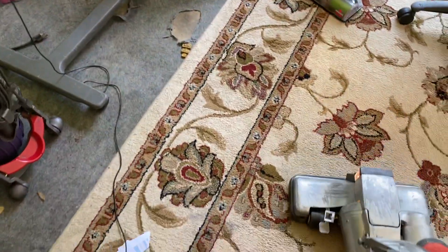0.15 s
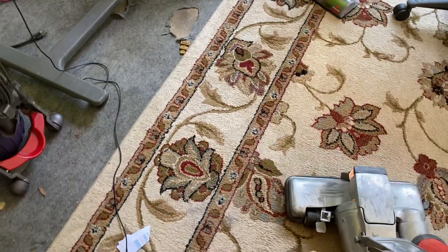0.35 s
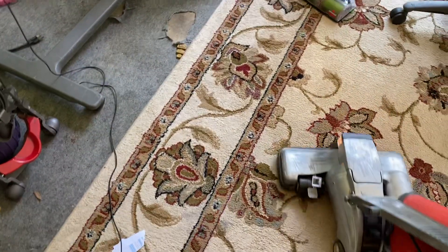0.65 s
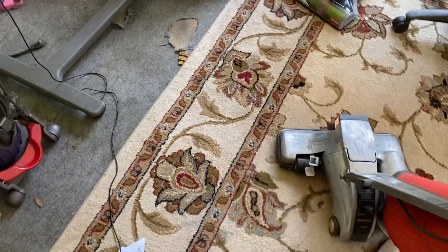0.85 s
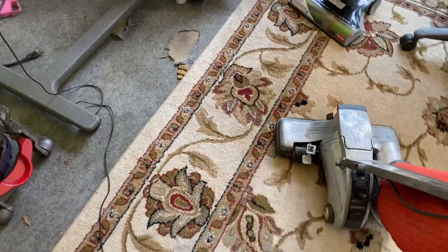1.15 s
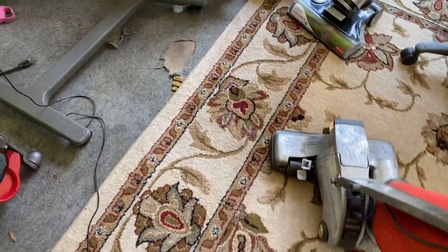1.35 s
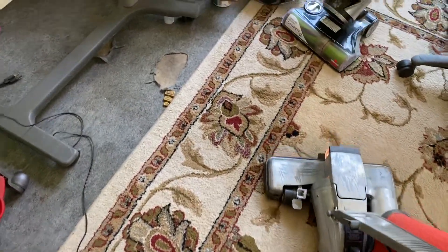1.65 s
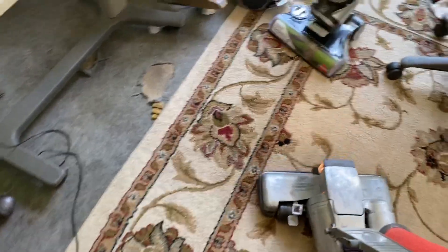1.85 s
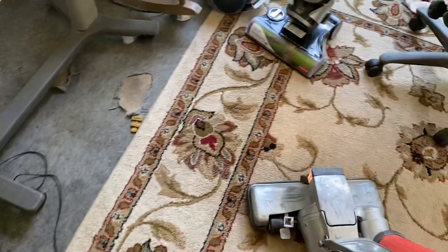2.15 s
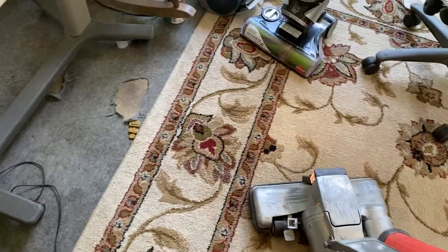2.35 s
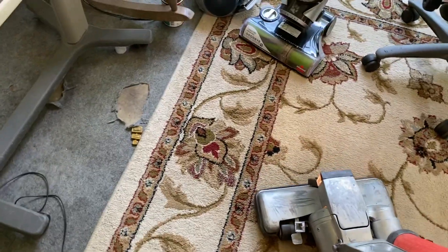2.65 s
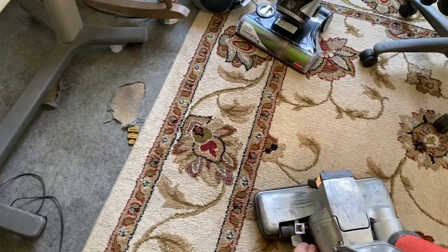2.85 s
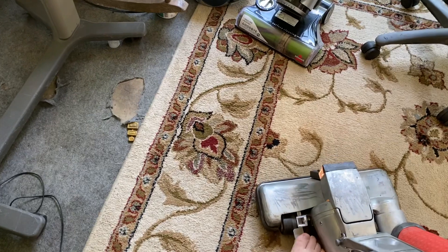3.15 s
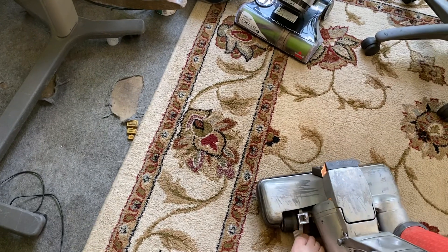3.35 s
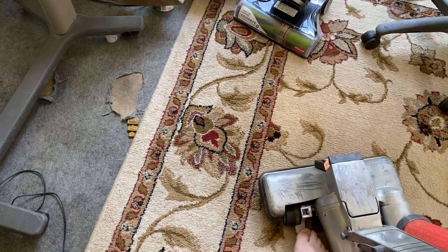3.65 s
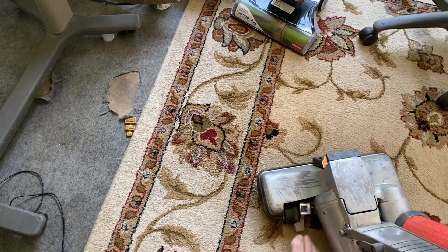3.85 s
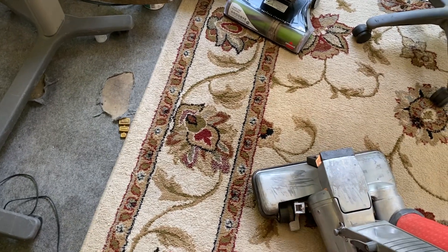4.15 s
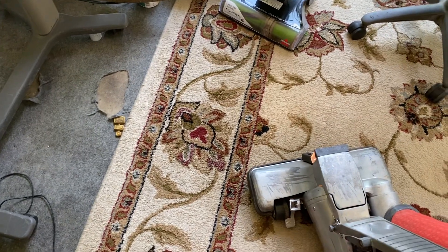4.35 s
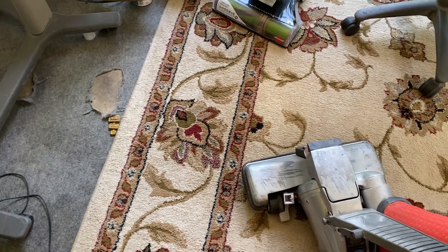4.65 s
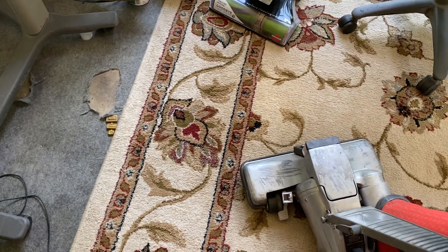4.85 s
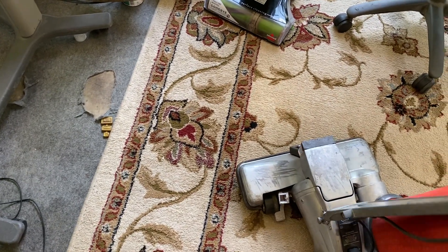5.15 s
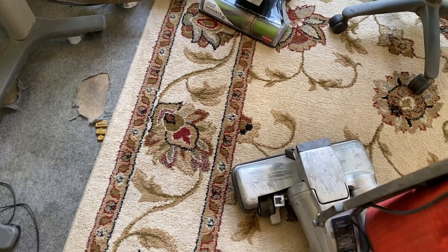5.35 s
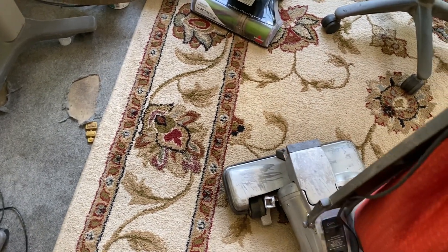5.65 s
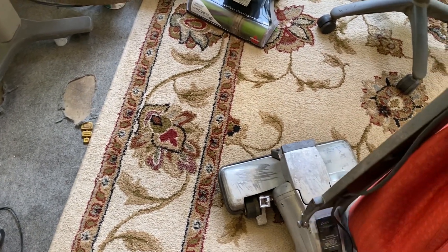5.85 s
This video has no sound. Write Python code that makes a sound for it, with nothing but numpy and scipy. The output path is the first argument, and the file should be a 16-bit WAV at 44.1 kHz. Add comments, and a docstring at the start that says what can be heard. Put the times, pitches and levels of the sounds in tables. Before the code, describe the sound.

An upright vacuum roars and whines on a rug, its lever ratchets through sharp clicks, then it switches off and the motor whine winds down.

```python
"""A loud roar of air with a motor's whine: an upright vacuum cleaner runs on a rug, its brush roll drumming on the pile.
The harder the brush bears on the rug, the slower the motor and the less air leaks in; the cleaner is drawn a bit closer.
The height lever ratchets through five notches and lifts the brush, so the unloaded motor speeds up a little.
Then the switch clicks off and the motor coasts down, its whine falling through the resonances of the housing.
Air is shaped noise, the motor and brush are sums of sines tied to one shaft, and clicks are short rings and cracks."""
import sys
import numpy as np
from scipy import signal
from scipy.fft import rfft, irfft
from scipy.io import wavfile
from scipy.ndimage import uniform_filter1d

SR = 44100
rng = np.random.default_rng(int(sys.argv[2]) if len(sys.argv) > 2 else 0)


def write(x):
    x = np.atleast_2d(x).T
    wavfile.write(sys.argv[1], SR, np.round(np.clip(x, -1, 1) * 32767).astype(np.int16))


N = 264644
T = np.arange(N) / SR
HZ = np.fft.rfftfreq(N, 1 / SR)

# All noise colours below are relative: noise() evens out their overall loudness.
OFF_S = 4.489  # the power is cut here
FREE_SPEED = 199.0  # unloaded shaft speed, turns a second
BEATS_PER_TURN = .617  # drum beats of the brush roll in one turn of the motor
HUM_ORDER, WHINE_ORDER, BLADES, BARS = 2, 6, 11, 22  # multiples of the shaft speed; BARS is the commutator tone

# How hard the brush roll bears on the rug: (t/s, contact 0-1)
RUG_CONTACT = [(0.0, 0.42), (0.04, 0.93), (0.19, 0.05), (0.43, 0.02), (0.51, 0.89), (0.73, 0.91),
               (0.93, 0.48), (1.35, 0.86), (1.65, 0.7), (1.98, 0.69), (3.05, 0.89), (3.33, 0.24),
               (3.97, 0.03)]


def rug_contact():
    """The brush bears harder or softer on the rug as time goes by."""
    return curve(RUG_CONTACT)


def shaft_speed(contact, sag=6, inertia_s=.238, first_load=.74, friction=43.4, air_drag=.004144):
    """The rug drags the motor down a little; once the power is cut, air drag and friction brake it."""
    # sag: turns a second lost at full contact
    powered = FREE_SPEED - sag * lagged(contact, inertia_s, first_load)
    # coasting, each second costs friction + air_drag * speed squared, in turns a second
    knee = np.sqrt(friction / air_drag)  # the speed at which both brake equally
    first_angle = np.arctan(np.interp(OFF_S, T, powered) / knee)
    coasting = knee * np.tan(first_angle - knee * air_drag * (T - OFF_S))
    return np.where(T < OFF_S, powered, coasting)


def working_state(contact, speed, air_lag_s=0.19):
    """What the levels depend on: rug contact, closeness, nozzle height and halvings of the air speed."""
    closer = np.interp(T, [1.82, 2.2], [0, 1])  # the cleaner is drawn closer
    raised = np.interp(T, [3.294, 3.465], [0, 1])  # the lever raises the nozzle
    # the air stream follows the fan a little late
    halvings = lagged(np.log2(FREE_SPEED / speed) * (T > OFF_S), air_lag_s)
    return contact, closer, raised, halvings


# Colours of the moving air, from deep to high: (f/Hz, level/dB per Hz)
ROAR_COLOUR = [(20, -61), (60, -19.5), (110, -10), (180, -9.5), (245, 0.5), (300, -6), (400, 3.5),
               (445, -5), (510, 1.5), (600, -7.5), (760, -46), (1200, -96.5)]
UPPER_COLOUR = [(450, -9), (590, 11), (820, 5.5), (945, 7.5), (1100, 2), (1290, 1.5), (1480, -85)]
RUSH_COLOUR = [(900, -0.5), (1400, 5), (1750, 5), (2100, 5), (2450, -0.5), (2750, 2), (3300, -5),
               (4000, -12), (7000, -23)]
HISS_COLOUR = [(1200, -15), (2200, 1), (3000, 5), (3800, 3), (4400, 5.5), (5200, 1.5), (7500, 2),
               (9000, -1), (10500, 3.5), (12000, 3), (13200, -4), (16300, -9)]
# Loudness of each: (clear of the rug level/dB, then the change/dB
# at full contact, once closer, once raised, per halving of the air speed)
ROAR_LEVEL = (-19, -8.5, 2, -5.5, -14.5)
UPPER_LEVEL = (-22.5, -11.5, 4.5, -9.5, -20.5)
RUSH_LEVEL = (-32, -2.5, 0.45, -4.5, -18.5)
HISS_LEVEL = (-41, -3.5, 0.7, -7, -5.5)


def air(turns, state, gust_db=1.0, chop=0.044, upper_ringing=0.17, rush_ringing=0.23, gap_s=0.09):
    """The fan roars through housing and bag, louder when air leaks in; the brush roll chops rush and hiss."""
    contact, *rest = state
    # the air leak under the nozzle opens and closes over gap_s
    seal = uniform_filter1d(contact, size=max(round(gap_s * SR), 1))
    air_state = [seal, *rest]
    roar = amp(level_of(ROAR_LEVEL, air_state)) * noise(ROAR_COLOUR)
    upper = amp(level_of(UPPER_LEVEL, air_state)) * noise(UPPER_COLOUR, upper_ringing)
    rush = amp(level_of(RUSH_LEVEL, air_state)) * noise(RUSH_COLOUR, rush_ringing)
    hiss = amp(level_of(HISS_LEVEL, air_state)) * noise(HISS_COLOUR)
    gust = amp(gust_db * wander(24.0))
    chopped = 1 + chop * np.cos(2 * np.pi * BEATS_PER_TURN * turns)
    return gust * (roar + upper + chopped * (rush + hiss))


# Weaker motor tones under power: (multiple of the shaft speed, level/dB)
POWERED_TONES = [(10, -52), (11, -41), (12, -46.5), (14, -50), (15, -53), (16, -54), (18, -57), (19, -57),
                 (24, -57), (31, -58), (39, -53), (40, -55), (54, -50.5), (55, -55), (57, -53.5)]
# Motor tones while coasting: (multiple of the shaft speed, level/dB)
COAST_TONES = [(2, -34), (6, -33), (11, -37), (16, -45), (18, -51), (22, -45.5), (23, -50), (27, -51),
               (30, -53), (34, -49), (37, -53), (38, -49), (41, -53), (44, -51), (49, -54), (60, -51)]
# The whine under power, which swells and fades: (t/s, level/dB)
WHINE_LEVEL = [(0, -32), (.48, -26.5), (.62, -45.5), (.79, -29.5), (1.1, -29.5), (1.35, -37), (1.6, -36),
               (1.85, -28.5), (2.6, -27), (3.1, -35.5), (3.5, -46.5), (4, -32)]
# Hum, and shift of the weaker tones: (clear of the rug level/dB,
# then the change/dB at full contact, once closer, once raised)
HUM_LEVEL = (-20.5, -7.5, 1, -7)
THIN_LEVEL = (-2.5, 0, 1.5, -6.5)
# Resonances the falling tones sweep through: (f/Hz, width f/Hz, level/dB)
HOUSING = [(400, 60, -1), (505, 60, -3), (605, 45, -5), (740, 40, -4), (830, 35, -8), (945, 60, 1.5),
           (1020, 40, -7.5), (1270, 70, -11), (1520, 70, -13), (1740, 100, -8), (2060, 110, -11),
           (2420, 200, -4), (2650, 110, -7), (2930, 230, 1), (3300, 230, -2.5), (3650, 190, -3),
           (4220, 400, -9), (7600, 900, -12), (11000, 1800, -10)]
# Resonances of the air path, for the falling whine: (f/Hz, width f/Hz, level/dB)
AIR_PATH = [(435, 42, 6.5), (492, 45, -2), (555, 20, -5), (732, 22, -2), (822, 38, 1), (1015, 75, 3.5),
            (1150, 120, 2.5)]
# Resonances of the motor case, for the falling commutator tone: (f/Hz, width f/Hz, level/dB)
MOTOR_CASE = [(1730, 70, -9), (2420, 190, -2.5), (2660, 110, -5), (2950, 170, -0.5), (3270, 230, 2),
              (3600, 150, -11)]


def motor(speed, turns, state, faint_db=-62, glide_db=-57.5, commutator_db=-53, fading_db=2.5,
          flutter_db=1.54, stall_speed=90.5, stall_db=-40, blur=0.0064, release=.13):
    """Imbalance, fan blades and carbon brushes sound multiples of the shaft speed."""
    powered_db, coast_db = ({round(k): db for k, db in table} for table in (POWERED_TONES, COAST_TONES))
    strong = {
        HUM_ORDER: level_of(HUM_LEVEL, state),
        WHINE_ORDER: curve(WHINE_LEVEL),
        BARS: commutator_db + fading_db * wander(7.3),
    }
    thin_db = level_of(THIN_LEVEL, state)  # at the pitch of the commutator tone; higher tones change more

    # free goes from 0 under power to 1 when the share "release" of the speed is lost
    slowing = np.clip(1 - speed / FREE_SPEED, 0, 1) * (T > OFF_S)
    free = np.minimum(slowing / release, 1)
    # stall_db for each halving below stall_speed (turns a second)
    stall = stall_db * np.maximum(np.log2(stall_speed / speed), 0)

    grid = np.arange(0, SR / 2, 2)
    housing = resonances(HOUSING, grid)
    own_path = {WHINE_ORDER: resonances(AIR_PATH, grid), BARS: resonances(MOTOR_CASE, grid)}
    steady, gliding = np.zeros((2, 2, N))
    for k in [HUM_ORDER, *range(5, 73)]:
        strength, swell = rng.standard_normal(), wander(7.2)
        # the fast air stream roughens the tones
        smear = blur * (1 - free) * np.sqrt(k) * wander(23)
        partial = tone(k * turns + smear, k * speed[0])
        thin = powered_db.get(k, faint_db) + thin_db * k / BARS + fading_db * swell
        steady += amp(strong.get(k, thin) + flutter_db * wander(4.6)) * partial
        # a falling tone flares at each resonance
        free_db = coast_db.get(k, glide_db + 2 * (strength + swell))
        flare = np.interp(k * speed, grid, own_path.get(k, housing))
        # the fan's tones die as the air stalls, the high ones fade more slowly
        airborne = np.clip((BLADES / k) ** 2, .2, 1)
        gliding += amp(free_db + flare + stall * airborne) * partial
    return (1 - free ** 2) * steady + reflections(free * gliding)


def mains_ripple(speed, turns, contact, level_db=-64, load_db=9, fading_db=4.0):
    """Current pulses put a tone on either side of the commutator tone, stronger under load, until power-off."""
    ripple = 120 * T  # pulses so far, at 120 Hz
    pair = 0
    for side in (-1, 1):
        pair = pair + amp(fading_db * wander(7.0)) * tone(BARS * turns + side * ripple, BARS * speed[0])
    return pair * amp(level_db + load_db * contact) * (T < OFF_S)


# Scraping of the carbon brushes: (f/Hz, level/dB per Hz)
RUB_COLOUR = [(1400, -5.5), (1650, -14), (2100, -10), (2700, -4), (3400, -10), (4500, -9), (9000, -26)]


def carbon_rub(speed, level_db=-52, slope_db=-2.0, ringing=0.58):
    """The carbon brushes keep scraping the commutator as long as it turns."""
    # slope_db for each doubling of speed
    return amp(level_db + slope_db * np.log2(speed / speed[0])) * noise(RUB_COLOUR, ringing)


# Rumble of the floor: (f/Hz, level/dB per Hz)
RUMBLE_COLOUR = [(10, -55), (30, -29), (48, -13), (66, 12), (95, 10), (150, 16), (300, -45)]
# Drumming and rumble: (clear of the rug level/dB, then the change/dB
# at full contact, once closer, once raised, per halving of the air speed)
DRUM_LEVEL = (-38, 18.5, -3.5, -0.5, -44)
RUMBLE_LEVEL = (-56, 22.5, -3.5, -31, -24)


def brush_roll(speed, turns, state, second_db=-10.0, third_db=-22, fourth_db=-17, slip=0.031, flutter_db=1.5):
    """Bristle rows drum on the rug and shake the floor; the belt slips and the upper partials are ragged."""
    beats = BEATS_PER_TURN * turns + slip * wander(3.3)
    drum = 0
    for k, db in enumerate([0, second_db, third_db, fourth_db], 1):
        ragged = amp(db + k * flutter_db * wander(28))
        drum = drum + ragged * tone(k * beats, k * BEATS_PER_TURN * speed[0])
    rumble = amp(level_of(RUMBLE_LEVEL, state)) * noise(RUMBLE_COLOUR)
    return amp(level_of(DRUM_LEVEL, state)) * drum + rumble


# Plastic clicks, such as those of the lever and the switch: (t/s, level/dB, knock f/Hz,
# knock level/dB, ring of the catch f/Hz, its upper ring f/Hz, rebound after t/s)
CLICKS = [(3.2745, 1.5, 1124, -14, 2630, 4920, 0.0023), (3.3137, 2, 1050, -6.5, 2410, 4580, 0.002),
          (3.351, -1, 1180, -15, 2520, 3440, 0.001), (3.411, -1, 890, -10, 2070, 5580, 0.0018),
          (3.5256, -3, 880, -9.5, 2066, 5250, 0.0021), (4.484, -18, 1040, -13, 1420, 4600, .0046),
          (5.918, -35, 1050, -15, 4800, 4730, .0025)]
# Ways the plastic shell rings: (f/Hz, decay t/s, level/dB)
PLASTIC_SHELL = [(1304, .0018, -12.5), (1820, 0.0035, -21.5), (2025, 0.0029, -15), (2500, 0.0018, -10.5),
                 (3282, 0.0023, -15), (6300, 0.0021, -22), (8420, 0.0019, -31)]
# The crack of a click: (f/Hz, level/dB per Hz)
CRACK_COLOUR = [(600, -10), (2400, 15.5), (5000, 7), (11000, 6), (16000, 2)]


def clicks(rise=0.00072, catch_db=-11, upper_db=-21, ring_s=0.0027, crack_db=-16.0, crack_decay=0.0019,
           rebound_db=-5, chatter_db=-14, chatter_s=0.019, chatter_per_s=330, unlike=0.61,
           room_db=-9, room_t60=0.27):
    """A catch snaps, rebounds and chatters loosely; the plastic shell rings with it and the room answers."""
    size = 4096
    t, hz = np.arange(size) / SR, np.fft.rfftfreq(size, 1 / SR)
    out = np.zeros((2, N + size))
    for s, db, knock_hz, knock_db, catch_hz, upper_hz, rebound in CLICKS:
        # two blows: the snap and its rebound
        ages = np.maximum([t, t - rebound], 0)
        blows = amp([[0], [rebound_db]]) * (1 - np.exp(-(ages / rise) ** 2))
        catch = [(knock_hz, ring_s, knock_db), (catch_hz, ring_s, catch_db), (upper_hz, ring_s, upper_db)]
        ring = 0
        for f, decay, level in [*catch, *PLASTIC_SHELL]:
            envelope = amp(level) * (blows * np.exp(-ages / decay)).sum(0)
            ring = ring + envelope * np.sin(2 * np.pi * (f * t + rng.random()))
        near, left, right, taps = rng.standard_normal((4, size))
        crack_fade = (blows * np.exp(-ages / crack_decay)).sum(0)
        crack = amp(crack_db) * crack_fade * (near + unlike * np.array([left, right]))
        # scattered taps after the rebound, each a small copy of the snap
        tapping = (rng.random(size) < chatter_per_s / SR) * (t > rebound)
        chatter = amp(chatter_db) * taps * np.exp(-t / chatter_s) * tapping
        struck = rfft(ring) + rfft(crack) * amp(read(CRACK_COLOUR, hz))
        snap = irfft(struck * (1 + rfft(chatter)) * ports(hz), size)
        start = round(s * SR)
        out[:, start:start + size // 2] += amp(db) * snap[:, :size // 2]
    return reflections(out[:, :N], room_db, room_t60)


# Soft thuds as the cleaner is moved about: (t/s, level/dB)
THUDS = [(1.11, -38), (1.53, -38), (1.69, -33), (2.37, -39), (5.67, -45)]
# Their dull colour: (f/Hz, level/dB per Hz)
THUD_COLOUR = [(30, -22), (58, 7), (85, -9), (200, -3), (400, -49)]


def thuds(half_length_s=0.056):
    """The body bumps dully on the rug: deep noise swells and fades."""
    swell = sum(amp(db) * np.exp(-((T - s) / half_length_s) ** 2) for s, db in THUDS)
    return swell * noise(THUD_COLOUR)


# Quiet background of the room: (f/Hz, level/dB per Hz)
ROOM_COLOUR = [(22, -25), (42, 8), (120, 8.5), (180, 16), (245, 11), (330, -4), (700, -22), (1500, -18),
               (8000, -42)]


def room(level_db=-50):
    """The room itself adds a faint, steady, mostly low noise."""
    return amp(level_db) * noise(ROOM_COLOUR)


def reflections(x, wet_db=-9, t60=.14):
    """The room repeats a sound late and duller: clicks gain a tail, falling tones beat and break up."""
    t = T[:SR // 2]
    tail = rng.standard_normal((2, len(t))) * amp(-60 * t / t60)  # fades by 60 dB in t60 seconds
    dull = signal.butter(1, 5000, fs=SR, output="sos")
    tail = signal.sosfilt(dull, tail / np.linalg.norm(tail[0]))
    return x + amp(wet_db) * signal.oaconvolve(x, tail, axes=1)[:, :N]


def resonances(table, hz, between_db=-27):
    """Gain of a hollow body in dB: strong at its resonances, weak between them."""
    gain = sum(amp(db) / (1 + (2 * (hz - f) / width) ** 2) ** 1.25 for f, width, db in table)
    return 20 * np.log10(gain + amp(between_db))


# How alike left and right are: (f/Hz, likeness 0-1)
LIKENESS = [(130, .98), (400, .94), (700, .78), (1400, .72), (3000, .85), (5000, .7), (11000, .8)]


def likeness(hz):
    """Left and right share more of the sound at some pitches than at others."""
    return np.clip(read(LIKENESS, hz), -1, 1)


def noise(spectrum, ringing=0):
    """Steady turbulence of a given colour; ringing lets the housing's resonances stand out of it."""
    a, b = rfft(rng.standard_normal((2, N)))
    same = likeness(HZ)
    grid = np.geomspace(100, 20000, 800)
    peaks = resonances(HOUSING, grid)
    stand_out = np.interp(HZ, grid, peaks - uniform_filter1d(peaks, size=60))
    colour = read(spectrum, HZ) + ringing * stand_out
    sides = np.array([a, same * a + np.sqrt(1 - same ** 2) * b])
    pair = irfft(sides * ports(HZ) * amp(colour), N)
    return pair / pair.mean(0).std()


def tone(turns, hz):
    """One partial; room reflections make it arrive out of step at the two ports."""
    apart = np.arccos(likeness(hz)) * rng.choice([-1, 1])
    angle = (2 * np.pi * ((turns + rng.random()) % 1)).astype(np.float32)
    port = ports(np.array([hz]))
    shift = (np.angle(port) + [[0], [apart]]).astype(np.float32)
    return np.sqrt(2) * abs(port) * np.sin(angle + shift)


# Left compared with right: (f/Hz, left minus right level/dB)
BALANCE = [(60, -2), (120, -2.3), (240, -3), (420, -6), (700, -5.5), (1300, -1.5), (2500, 1.5), (5000, 1.7),
           (9000, 0)]


def ports(hz, delay_s=2.7e-5):
    """Gain and phase at the left and right microphone port; sound reaches the right one delay_s earlier."""
    gain = amp(np.array([[.5], [-.5]]) * read(BALANCE, hz))
    return gain * np.exp(np.array([[-1j], [1j]]) * np.pi * hz * delay_s)


def level_of(row, state):
    """A layer's level in dB: its own level plus what each part of the working state adds."""
    base, *changes = row
    return base + sum(change * part for change, part in zip(changes, state))


def lagged(x, lag_s, start=0):
    """Follows x with a first-order lag, from a starting value."""
    keep = np.exp(-1 / (lag_s * SR))
    return start + signal.lfilter([1 - keep], [1, -keep], x - start)


def wander(rate_hz):
    """Smooth chance of rms 1, changing at about this rate."""
    steps = rng.standard_normal(N // 64 + 2)  # one step every 64 samples
    smoothing = np.exp(-(np.fft.rfftfreq(len(steps), 64 / SR) / rate_hz) ** 2)
    slow = irfft(rfft(steps) * smoothing, len(steps))
    return np.interp(np.arange(N) / 64, np.arange(len(slow)), unit(slow))


def curve(rows):
    """A timed table read at every sample, in straight lines between its rows."""
    s, value = np.transpose(rows)
    return np.interp(T, s, value)


def read(points, hz):
    """Reads a spectrum table on a log-frequency axis."""
    f, value = np.transpose(points)
    return np.interp(np.log(hz + 1), np.log(f + 1), value)


def amp(db):
    """Decibels to gain."""
    return np.exp(np.asarray(db) * (np.log(10) / 20))


def unit(x):
    """Scales to rms 1."""
    return x / np.sqrt(np.mean(x ** 2) + 1e-20)


def scene(waver=0.000348):
    """The brush's contact with the rug loads one shaft, which drives the fan, the tones and the brush roll."""
    contact = rug_contact()
    speed = shaft_speed(contact) * (1 + waver * wander(10.9))
    turns = np.cumsum(speed) / SR
    state = working_state(contact, speed)
    machine = air(turns, state) + motor(speed, turns, state) + mains_ripple(speed, turns, contact)
    machine = machine + carbon_rub(speed) + brush_roll(speed, turns, state)
    return machine + clicks() + thuds() + room()


def record(dry, low_cut_hz=38, top_hz=16300):
    """The microphone loses the deepest bass and rounds off the highest peaks; then the extreme top is cut."""
    lean = signal.sosfilt(signal.butter(2, low_cut_hz, "highpass", fs=SR, output="sos"), dry)
    rounded = lean / (1 + (lean / .9) ** 8) ** (1 / 8)
    top_cut = signal.firwin(511, top_hz, window=("kaiser", 9), fs=SR)
    return signal.oaconvolve(rounded, top_cut[None], "same")


dry = scene()
out = record(dry)
write(out)
```